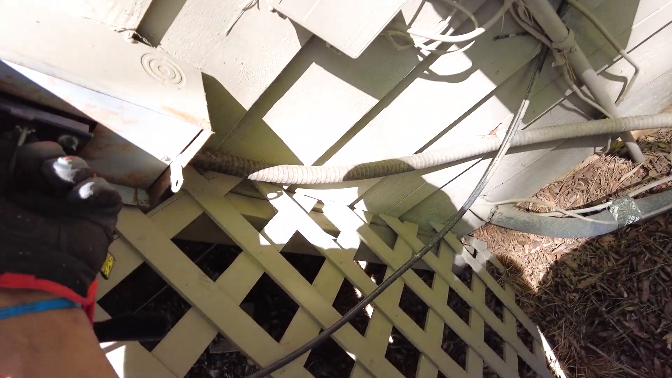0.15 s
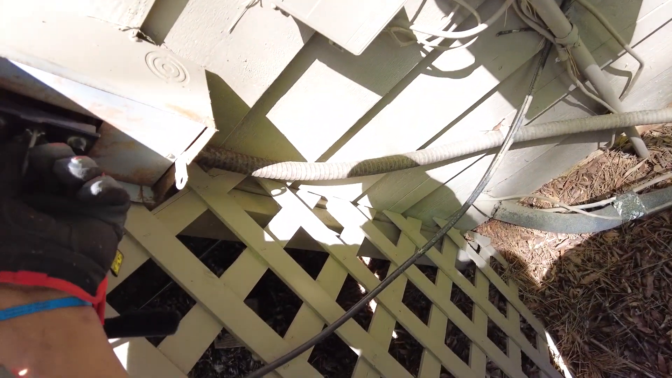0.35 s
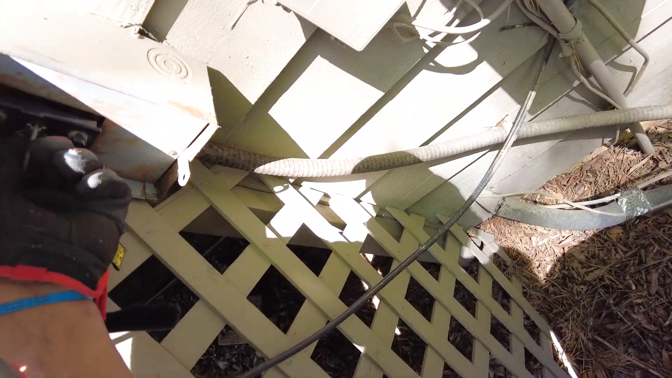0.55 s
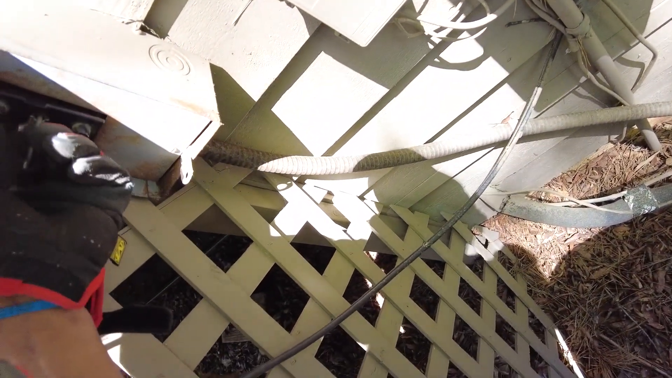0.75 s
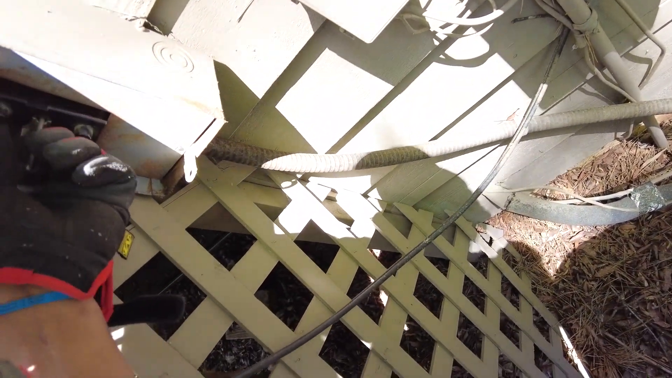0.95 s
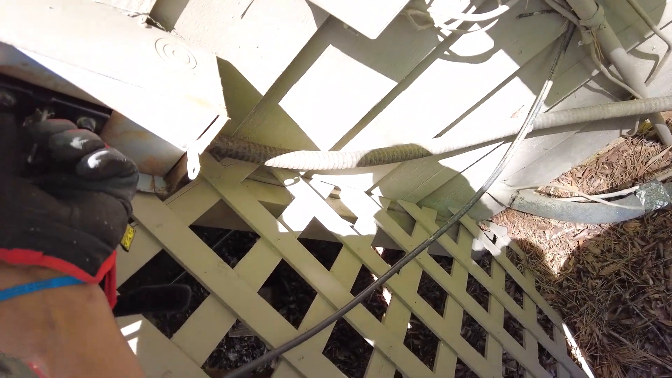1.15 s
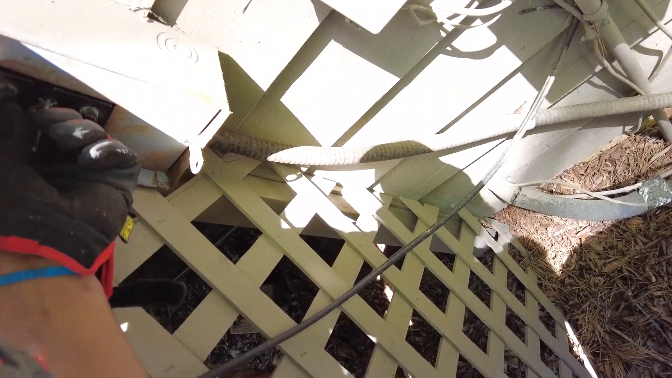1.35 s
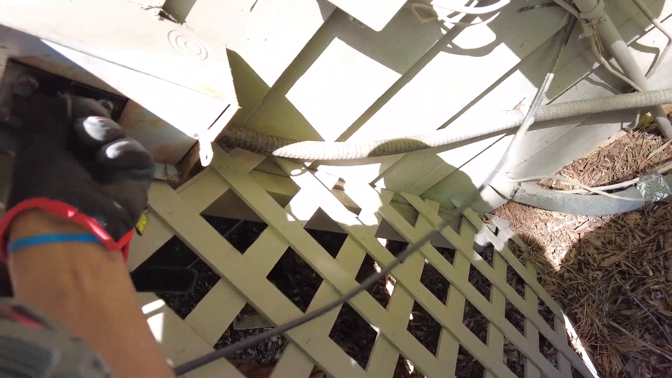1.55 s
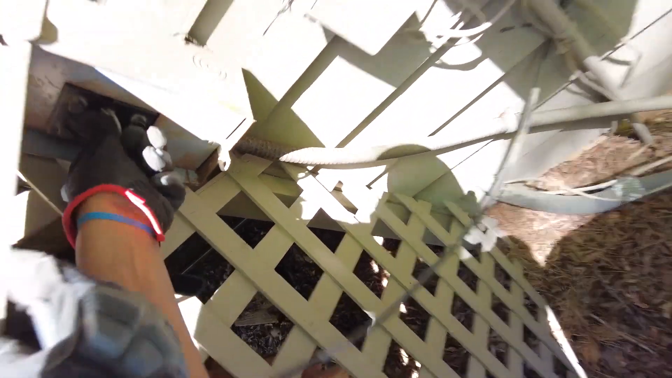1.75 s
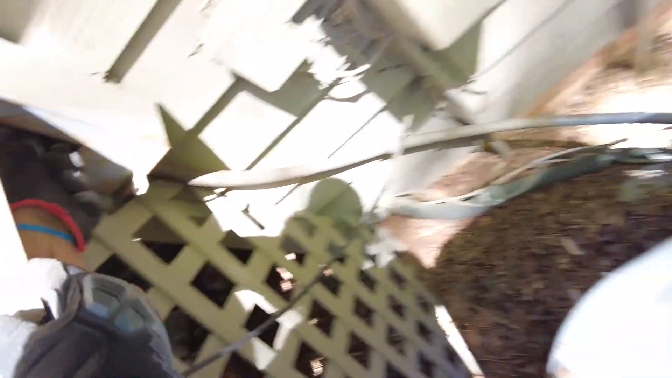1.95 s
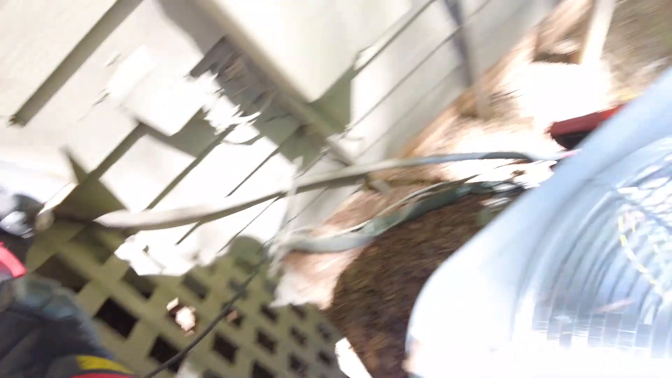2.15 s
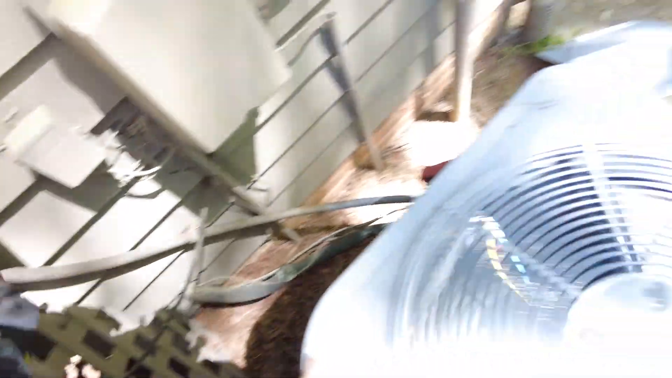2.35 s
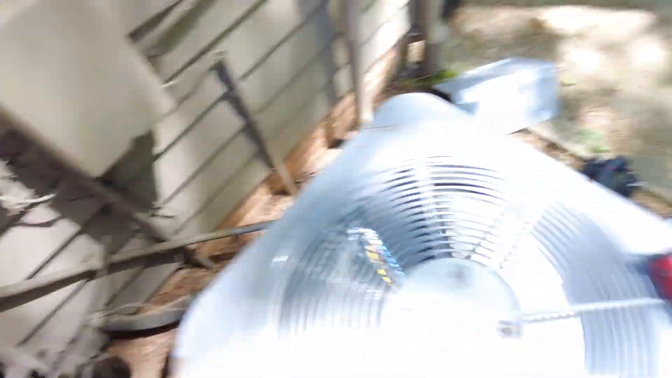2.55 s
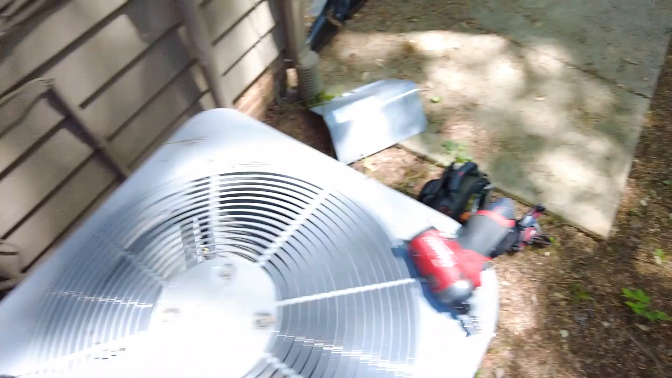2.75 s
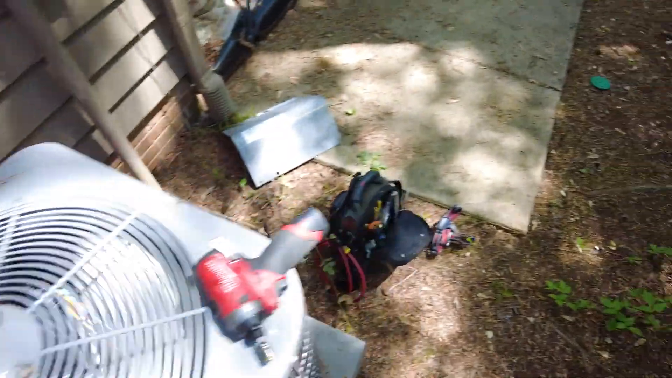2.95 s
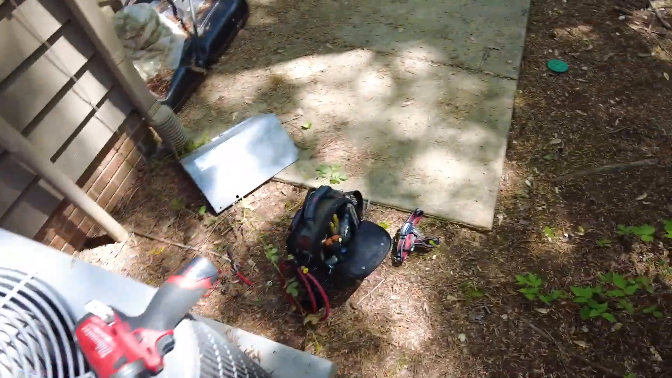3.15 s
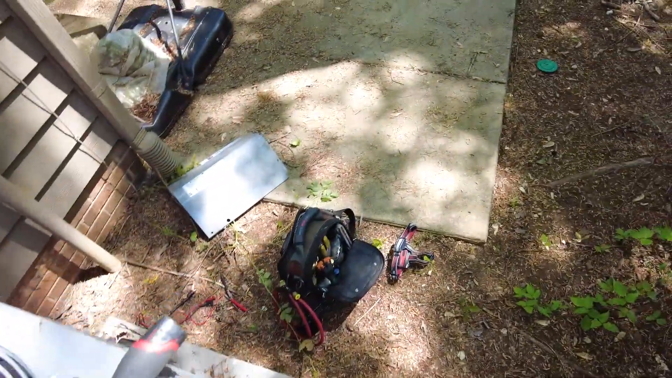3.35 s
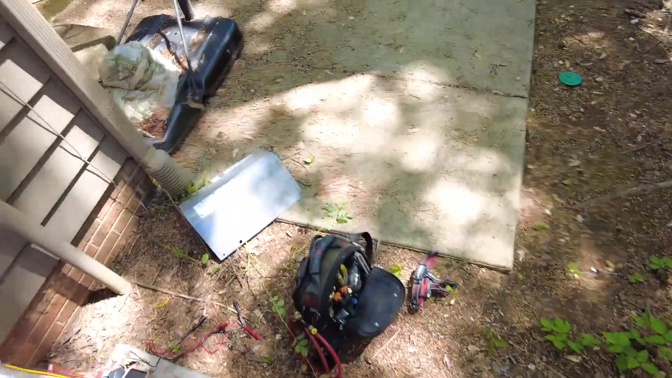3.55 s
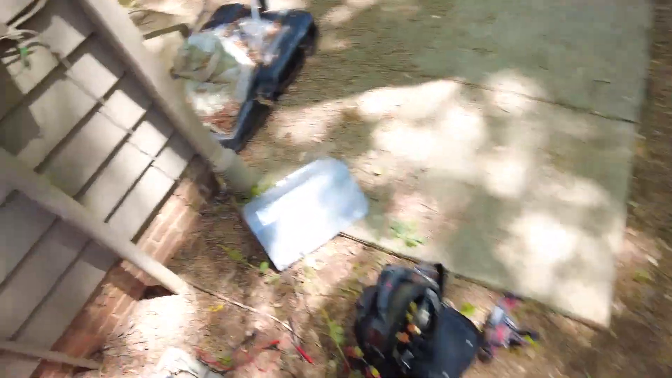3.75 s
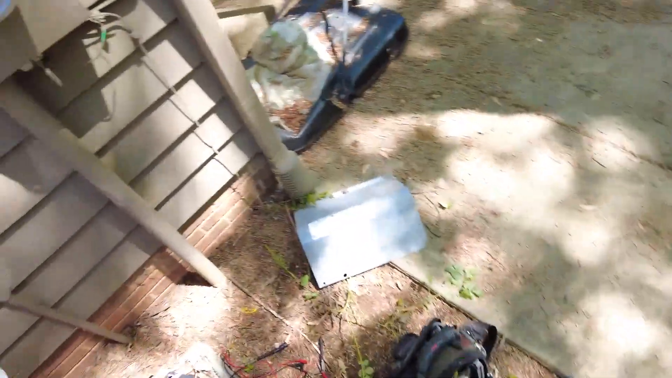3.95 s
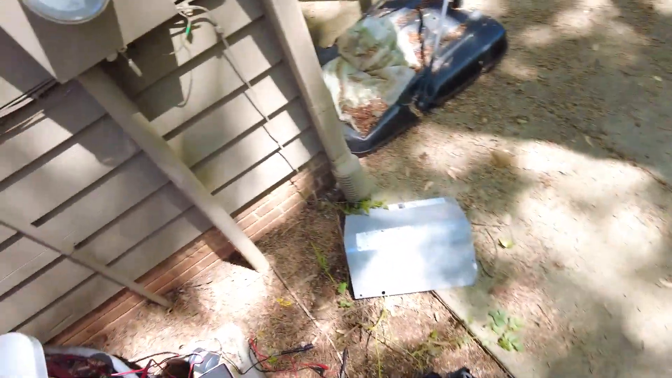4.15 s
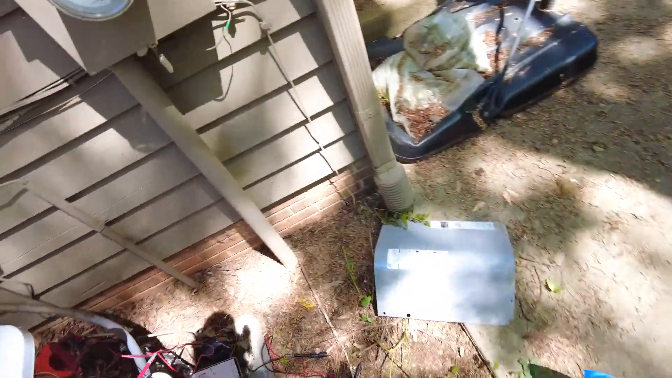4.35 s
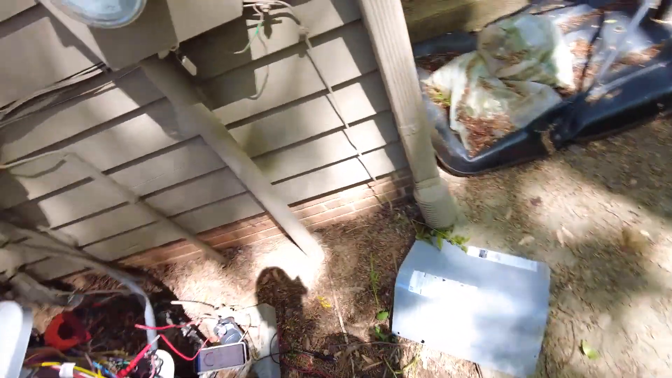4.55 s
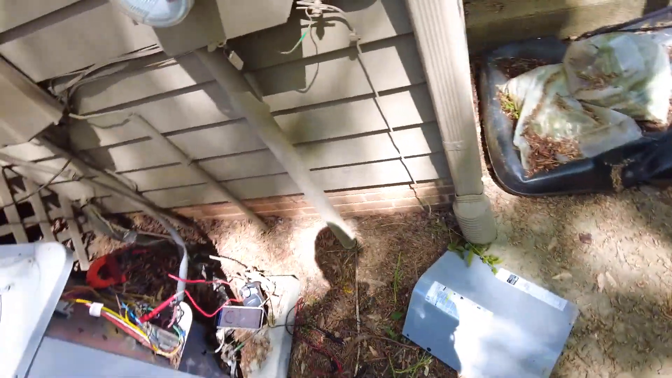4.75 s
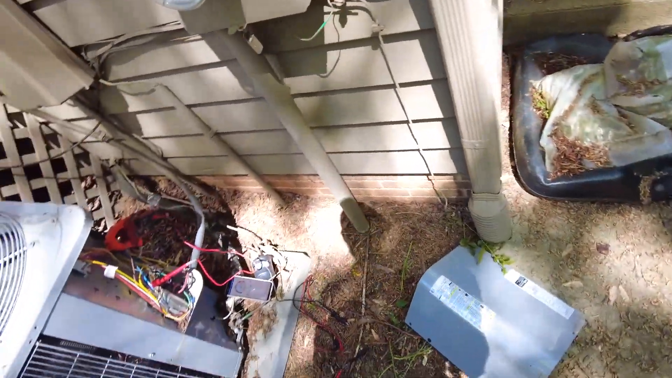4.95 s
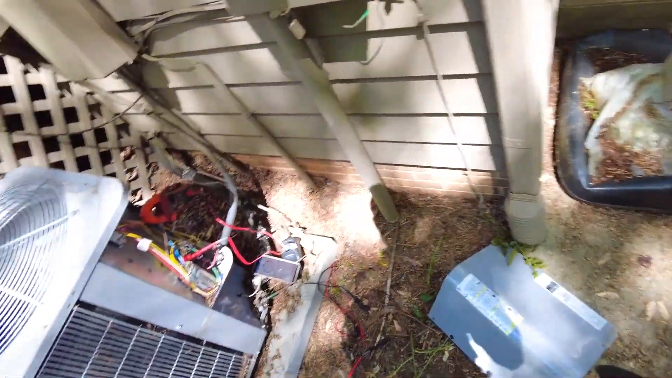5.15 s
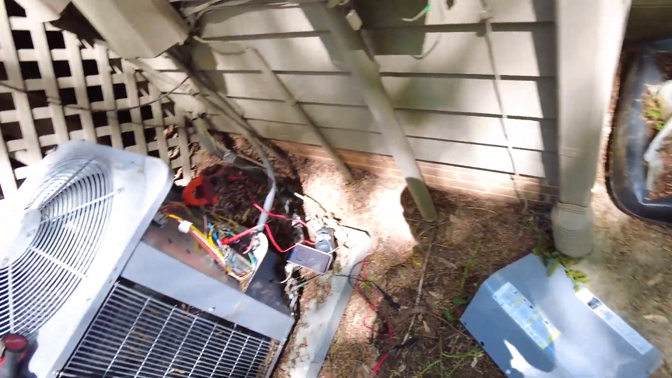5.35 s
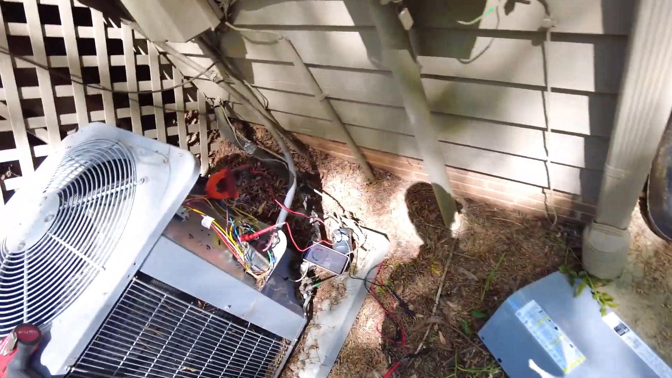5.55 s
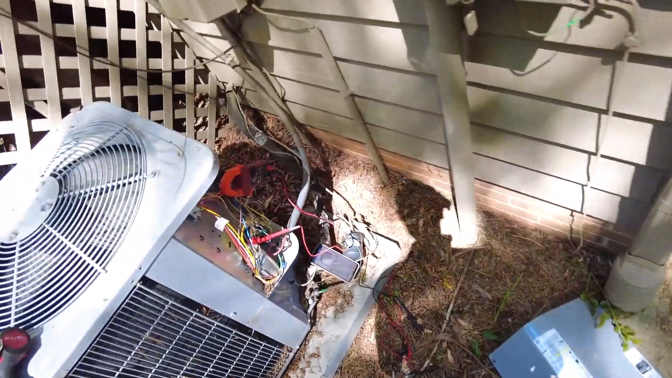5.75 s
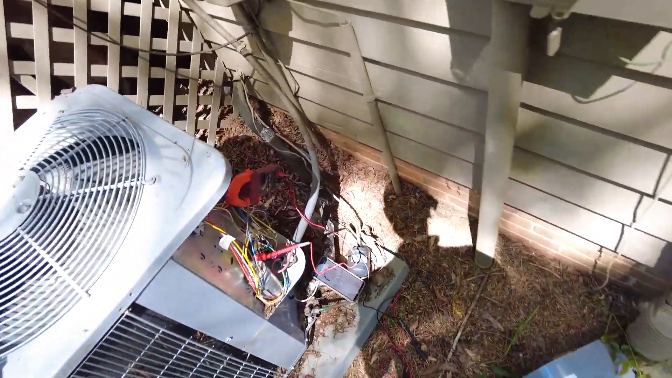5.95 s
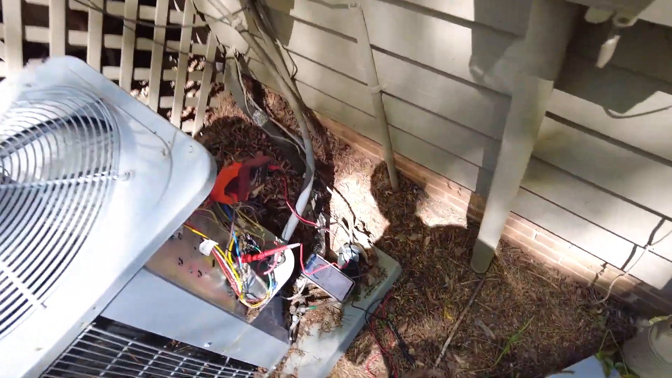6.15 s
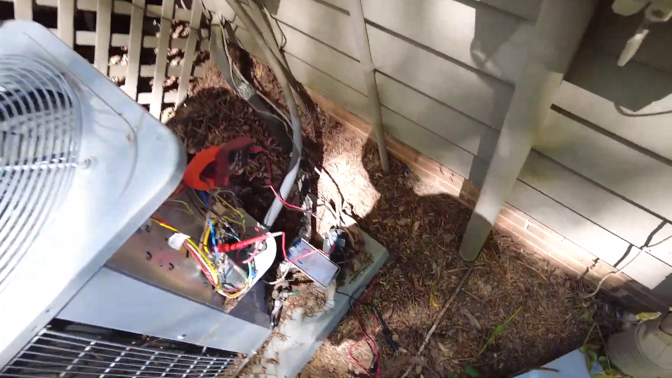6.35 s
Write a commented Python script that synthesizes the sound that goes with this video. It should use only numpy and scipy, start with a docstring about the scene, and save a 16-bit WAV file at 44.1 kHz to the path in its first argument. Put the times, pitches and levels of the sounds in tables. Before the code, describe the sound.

Outdoors by a wall, close to the microphone, a gloved hand knocks and scrapes a plug in a sheet-metal box. A loud clack brings instant electrical hum; the compressor shudders, panels rattle and the fan spins up. The microphone crosses the fan's updraught with heavy wind thumps, then moves round the unit through steady hum, throbbing blades and hissing air, with faint rustles and footsteps.

```python
"""An outdoor air conditioner starts: motor hum at once, then a shuddering compressor and a fan beating against the hum.
Hum, whine and blade tones are sine stacks; rushing air, wind and cloth are coloured noise under gain curves.
Before that a gloved hand works a pull-out plug into the disconnect box: noise cracks with ringing metal modes.
The microphone travels through the fan's updraught and on around the unit, with rustling clothes, mulch and jingles."""
import sys
import numpy as np
from scipy import signal
from scipy.fft import rfft, irfft, next_fast_len
from scipy.io import wavfile
from scipy.ndimage import uniform_filter1d, map_coordinates

SR = 44100
rng = np.random.default_rng(int(sys.argv[2]) if len(sys.argv) > 2 else 0)


def file_out(sig):
    """Save sig as 16-bit WAV at sys.argv[1]."""
    # one column per channel
    cols = np.atleast_2d(sig).T
    # limit, then scale
    lim = np.clip(cols, -1, 1)
    pcm = np.round(lim * 32767).astype(np.int16)
    wavfile.write(sys.argv[1], SR, pcm)


N = 286209

# The plug closes the circuit; the current comes on with this time constant
POWER_ON_S, POWER_RISE_S = 1.41, 0.084
# The microphone passes from the box to the far side of the fan; time constant of the crossfade
CROSSING_S, CROSSING_TIME_CONSTANT_S = 2.68, 0.11
# In every swell table, length is the full width where the bell has fallen to 1/e

# Motor hum: multiple of mains, level at the box/dB, level past the fan/dB, fade from there/(dB/s),
# waver past the fan/dB, extra under the starting load/dB
HUM = [(2, -36.5, -36.5, 2.5, -0.5, 5), (6, -34.5, -45, 0.5, 2, 0), (8, -59.5, -63, -2, 5, -5)]
# Brief dips of the hum: t/s, depth/dB, length/s
HUM_DIPS = [(1.68, 5, 0.075), (2.58, 6, 0.07)]
MAINS_HZ = 60
# The motors draw most current while the compressor takes up its load
LOAD_S, LOAD_LENGTH_S = 1.69, 0.54

# Compressor whine: multiple of shaft speed, level in the first beam/dB, level in the second beam/dB
WHINE = [(17, -12, -19), (18, -0.5, -23), (19, -23, -17), (20, -1.5, -14), (21, -4, -0.5), (22, -7, -8.5),
         (23, -16, -4.5), (24, -7, -18), (28, -13, -12)]
# Beams of the whine that the microphone passes through: t/s, level/dB, length/s
WHINE_BEAMS = [(4.17, -54.5, 1.17), (6.207, -50, 1.33)]
# Low compressor overtones: multiple of shaft speed, level relative to DRONE_DB/dB
DRONE = [(2, 1.5), (3, -6.5), (4, -6), (5, -8.5), (6, -3), (8, -7), (12, -6.5), (14, -10), (16, -12)]
SHAFT_HZ = 59.22
OUTSIDE_BEAM_DB, DRONE_DB = -12.5, -54.5   # the first is relative to each beam
STANDING_DB, STANDING_PER_S = 2.0, 2.0   # spread and pace of the standing-wave swing

# Compressor rocking on its mounts: t/s, level/dB, multiple of mains, f/Hz at t, sag/(Hz/s), rise/(dB/s), fall/(dB/s)
SHUDDERS = [(1.64, -27, 2, 113.4, 147, 168, 115), (1.72, -33, 6, 356, 200, 500, 330)]

# Fan run-up: t/s, blade passes per second/Hz
FAN_SPEED = [(1.4, 0), (2.0, 23.9), (2.5, 35), (2.9, 37.63), (6.5, 37.63)]
# Blade tones: multiple of the blade rate, level past the fan/dB, share of the facing swing
BLADES = [(1, -39, 0.6), (2, -35.5, 1.12), (3, -34.5, 0.6), (5, -63.5, -0.9)]
# Unequal blades buzzing past the grille struts: multiple of the fan's turning rate, level past the fan/dB
BLADE_BUZZ = [(9, -58), (13, -58), (14, -62.5), (15, -61), (18, -65), (21, -64), (22, -68), (30, -61),
              (37, -65.5)]
BLADE_COUNT, BLADES_AT_BOX_DB = 2, -9.5   # the level is relative to past the fan
# How openly the microphone faces the grille: t/s, level/dB
FACING = [(1.45, -1.5), (2.15, -6.5), (2.5, 1.5), (2.85, -8), (3.55, -12), (4.6, -6), (5.1, -6),
          (5.9, -3.5), (6.4, -0.5)]
# Blade rush, cabinet roar, grille hiss: level at full speed/dB, share of the facing swing,
# drop at standstill/dB, fade past the fan/(dB/s)
AIR = [(-49, -0.25, 27, 0.5), (-52.5, -0.38, 13, 1.13), (-46.5, 0.99, 3.5, 0)]
# Colour of the blade rush: f/Hz, density/(dB per Hz)
RUSH = [(130, -4), (200, -6), (270, 3.5), (400, 3.5), (560, 2), (700, -2), (900, -6.5), (1500, -28)]
# Colour of the cabinet roar: f/Hz, density/(dB per Hz)
ROAR = [(500, -6), (700, 9), (900, 5.5), (1150, 8), (1400, 3.5), (1800, -7.5), (2400, -12), (5000, -40)]
# Colour of the grille hiss: f/Hz, density/(dB per Hz)
HISS = [(1000, 4), (1130, 6), (1250, 12), (1320, 9), (1400, 11.5), (1500, 7.5), (1700, 6.5), (2200, 1.5),
        (3100, 1), (3700, -3.5), (4400, -2.5), (5500, -9.5), (7000, -14), (10000, -18.5), (15500, -21.5)]
# Swells of the rush at the start and over the fan rim: t/s, level/dB, length/s
SURGES = [(1.6, -41.5, 0.57), (2.28, -45, 0.37), (2.58, -37.5, 0.24)]
# Colour of those swells: f/Hz, density/(dB per Hz)
SURGE = [(130, -3), (270, -0.5), (450, 1.5), (560, 4.5), (720, -2.5), (870, -8), (1050, -25), (1280, -23),
         (1600, -27), (2500, -15)]

# Cabinet rattle while the compressor takes up its load: t/s, level/dB, length/s
RATTLES = [(1.555, -44.5, 0.046), (1.625, -41.5, 0.077), (1.73, -50, 0.14), (1.9, -40, .1),
           (2.3, -61, 0.26)]
# Loose cabinet panels: f/Hz, level/dB, t60/s
PANELS = [(584, -6, .04), (1070, 0, 0.039), (1280, 0.5, 0.042), (1410, -1, 0.026), (1600, -13, .025),
          (1870, 2, 0.025), (2190, -3, .015), (3030, -4.5, 0.0088)]
RATTLE_PER_S = 200   # average ticks

# Plug, box and lid knocks: t/s, level/dB, hardness as tilt/(dB/octave), t60/s, main ring f/Hz, main ring over level/dB
KNOCKS = [(.135, -46, -3, 0.077, 1740, 4), (.150, -47.5, -3, 0.072, 2890, 2),
          (.264, -54, -3, 0.043, 3740, 6), (.368, -40, -1, 0.084, 2470, 1.5),
          (.383, -48.5, -2.5, 0.23, 1102, 7.5), (.417, -41, -3.5, 0.08, 475, 10),
          (.431, -45.5, -2.5, 0.098, 1797, -2), (.552, -48.5, -3, 0.11, 456, 7.5),
          (.630, -41.5, -4, 0.086, 1750, 5), (.808, -46, -5, 0.085, 501, 4.5),
          (.908, -46.5, -3, 0.076, 1780, 9), (.926, -40, -2.5, 0.077, 2750, 6),
          (.933, -37.5, 3, 0.032, 5570, 9.5), (1.147, -46, 4.5, 0.064, 1463, 13.5),
          (1.149, -53, 4, 0.022, 6000, 27.5), (1.343, -49, -3.5, 0.97, 507, -14),
          (1.383, -22.5, 3, 0.046, 1095, -1), (1.391, -33, 0, 0.045, 514, 0),
          (1.400, -23.5, -0.5, 0.05, 794, 4.5), (1.409, -25.5, 1, .03, 546, 5),
          (1.416, -32, -1, 0.068, 1070, 2), (1.477, -47, -0.5, 0.12, 1250, 7),
          (1.538, -45.5, -0.5, 0.12, 230, 13), (1.821, -43.5, -3.5, 0.057, 1460, 14),
          (1.877, -32.5, -2.5, 0.04, 1464, 11.5), (1.885, -45, 0, .025, 4950, 12),
          (1.893, -36, 2, 0.023, 5450, 9), (1.902, -38, 1, 0.022, 6050, 9),
          (1.911, -38, -0.5, 0.027, 4450, 8), (1.927, -36, -4, 0.044, 4340, 9),
          (1.949, -38, -1, 0.049, 550, 12), (1.996, -43.5, -8.5, 0.074, 572, 5),
          (2.505, -46.5, 1.5, 0.39, 3240, -5), (2.662, -39.5, 3.5, 0.06, 2100, 3.5)]
# Modes of the sheet-metal box: f/Hz, level/dB, t60/s
BOX = [(237.6, 0.5, 0.16), (462, 3, 0.12), (559, 4.5, 0.093), (802, -2.5, 0.13), (1082, -4, 0.12),
       (1270, -8, 0.14), (1505, 0.5, 0.17), (1808, 2.5, 0.086), (2670, -6, 0.061), (2850, -6.5, 0.099),
       (3150, -12, 0.082), (3370, -22.5, 0.47), (4580, -27, 0.28), (4320, 8.5, 0.028), (4700, 5.5, 0.03),
       (5950, 9, 0.03), (7770, -1, 0.04), (11800, -5, 0.03)]
# Crack of a contact: f/Hz, density/(dB per Hz)
CRACK = [(110, 3), (230, 6.5), (520, 9), (850, -9), (1150, 5.5), (1750, 4), (2100, -1), (3500, -1),
         (6100, -2.5), (7000, -4.5), (10000, -6), (15000, -8)]
# Colour of a contact of middling hardness: f/Hz, level/dB
CONTACT = [(450, 0.5), (1400, -0.5), (3500, -1), (7000, -14), (10000, -15.5)]
PIVOT_HZ = 1400   # hardness tilts the colour about this pitch
# Thumps of the glove heel on the panel: t/s, level/dB, panel f/Hz, t60/s
THUMPS = [(0.4157, -21, 268, 0.074), (.550, -21, 260, 0.025), (.926, -23.5, 485, 0.075)]
THUMP_RISE_S = 0.0034
# Plug and glove sliding on metal, later boots scuffing the ground: t/s, level/dB, length/s
SLIDES = [(.46, -52, 0.092), (.62, -51.5, 0.24), (.92, -43, 0.058), (.97, -47.5, 0.083), (1.11, -50, 0.076),
          (1.23, -51, .03), (1.64, -40.5, 0.14), (1.77, -52, 0.12), (1.905, -34, 0.078), (1.988, -34, 0.03),
          (4.07, -53, 0.13), (4.6, -46.5, 0.17), (6.3, -47, 0.29)]
# Colour of the sliding: f/Hz, density/(dB per Hz)
SCRAPE = [(200, -5), (330, 10.5), (500, 12), (700, 3.5), (950, -9), (1400, 3.5), (2100, -17.5), (3300, -15),
          (5000, -16), (7000, -31), (12000, -35)]
# Squeaks where plug and glove drag: t/s, level/dB, length/s, f/Hz, glide/(octaves/s)
SQUEAKS = [(0.681, -54, .07, 900, -4.5), (0.914, -40, .025, 542, 1.5), (0.921, -40, .022, 720, 1),
           (1.567, -37.5, 0.025, 1413, 9.5), (1.825, -46, .018, 1422, -7.5),
           (1.888, -31.5, .03, 1424, -2.5)]

# Gusts on the microphone: t/s, level/dB, length/s
GUSTS = [(1.43, -37.5, 0.13), (1.58, -43, 0.23), (2.0, -37.5, 0.29), (2.42, -41, 0.22), (2.6, -21, 0.093),
         (2.68, -23, 0.042), (2.77, -13, 0.1), (2.87, -10.5, 0.15), (3.04, -19.5, 0.14), (3.28, -36, 0.33)]
# Colour of gusts and draught: f/Hz, density/(dB per Hz)
WIND = [(11, -8.5), (25, 6), (44, 7), (65, -8), (95, -2.5), (160, -18.5), (230, -18.5), (450, -29),
        (750, -53), (1500, -69), (4000, -94)]
DRAUGHT_DB, DRAUGHT_FOLLOWS = -33.5, 2.4   # steady draught past the fan; share of the facing swing
# Single eddies that hit the microphone and die away: t/s, level/dB, t60/s
EDDIES = [(2.573, -21, 0.086), (2.667, -12.5, 0.22), (2.711, -9.5, 0.15), (2.783, -13.5, 0.21),
          (2.803, -13, 0.26), (2.841, -11, 0.18), (2.885, -18.5, 0.31), (2.937, -14.5, 0.23),
          (2.972, -22, 0.087), (3.005, -17.5, 0.11), (3.036, -18.5, 0.086)]
# Colour of the eddies: f/Hz, density/(dB per Hz)
BUFFET = [(30, 3.5), (100, 5.5), (170, 1), (240, -5.5), (330, -9), (450, -16.5), (700, -24), (1000, -46),
          (2000, -54)]
EDDY_RISE_S = 0.00254
FRONT_HALF_WIDTH_S, FRONT_DB = 0.0011, -1   # pressure front of an eddy; its height over the eddy's level
# Fastest air tearing at the microphone ports: t/s, level/dB, length/s
TEARS = [(2.62, -34, 0.046), (2.68, -44, 0.036), (2.845, -27, 0.049), (2.925, -35, 0.065)]
# Colour of the tearing: f/Hz, density/(dB per Hz)
TEARING = [(300, 0), (500, 4), (700, -9), (900, -12), (1400, -19), (2500, -34)]

# Twigs and grit under the boots: t/s, level/dB, hardness as tilt/(dB/octave), t60/s, main ring f/Hz, ring over level/dB
TWIGS = [(3.192, -55, -6, 0.11, 1270, 10), (3.230, -50.5, 1, 0.035, 1910, -2),
         (3.994, -46.5, 2.5, 0.03, 2110, 4.5)]
# Strokes of sleeve, glove and boots in the mulch: t/s, level/dB, length/s
RUSTLES = [(.445, -67, 0.1), (1.68, -49, 0.13), (1.915, -48.5, 0.06), (2.04, -52, 0.46),
           (2.28, -41.5, 0.031), (2.42, -46.5, 0.077), (2.525, -50.5, 0.045), (2.85, -52.5, 0.56),
           (3.2, -56, 0.24), (4.6, -57, 0.13), (5.23, -55.5, 0.11), (5.82, -55, .16), (6.32, -48, 0.092)]
# Colour of the rustling: f/Hz, density/(dB per Hz)
CLOTH = [(1500, 16.5), (2500, -11), (3100, -17), (3900, -5), (4400, 4), (5200, -1), (6100, 0), (6900, -7),
         (7700, -1.5), (8500, -6), (9400, -4.5), (10200, -6.5), (12000, -6), (15500, -6.5)]
STIRRING_FROM_S, STIRRING_DB = 1.5, -63   # the hand lets go and the clothes keep stirring
# Thin jingles of small metal things with the steps: t/s, level/dB, length/s
JINGLES = [(4.695, -55, 0.031), (4.765, -61, 0.11), (5.23, -63, .08)]
# Modes of those small things: f/Hz, level/dB, t60/s
TRINKETS = [(10800, -5, 0.0095), (13500, -6, .005), (14700, -2, .003), (15600, 0, .007)]
JINGLE_PER_S = 300   # average ticks

# Colour of the quiet yard: f/Hz, density/(dB per Hz)
YARD = [(12, -31), (20, -27), (43, 7), (76, 5.5), (180, -8), (249, -11), (310, -23.5), (525, -18.5),
        (620, -22.5), (966, -26.5), (1050, -28), (1460, -22.5), (2100, -34), (2850, -35.5), (10800, -56.5),
        (15000, -58)]
YARD_DB = -45.5

# Stereo spread at arm's length: f/Hz, side minus middle level/dB
NEAR = [(85, -13), (170, -11), (320, -8), (550, 3.5), (880, 4), (1080, 10.5), (1400, -16), (2200, -4.5),
        (4000, -5.5), (7500, -1), (12500, 1)]
# Stereo spread farther off: f/Hz, side minus middle level/dB
FAR = [(35, -26), (85, -22.5), (170, -15), (320, -10.5), (550, -4), (880, 6), (1400, -10), (2200, -8),
       (4000, -2.5), (7500, -0.5), (12500, -1.5)]
# The image closes to mono at MONO_S over NARROW_S, then opens at a rate that would take REOPEN_S to full width
MONO_S, NARROW_S, REOPEN_S = 3.513, 0.65, 3.97
CUTOFF_HZ = 15900


def motor_hum():
    """The pull on the windings peaks twice per mains cycle, with a strong third overtone; loudest by the box."""
    t, past, out = np.arange(N) / SR, past_fan(), 0
    load = swells([(LOAD_S, 0, LOAD_LENGTH_S)])
    dip_db = sum(depth_db * swells([(s, 0, length)]) for s, depth_db, length in HUM_DIPS)
    for k, box_db, far_db, fade_db_per_s, waver_db, load_db in HUM:
        here_db = box_db + load * load_db - dip_db
        walk_db = past * (far_db - box_db - fade_db_per_s * (t - CROSSING_S))
        db = here_db + walk_db + waver_db * past * drift(7)
        out = out + from_db(db) * tone(round(k) * MAINS_HZ * t, k * MAINS_HZ)
    return powered() * out


def compressor(run_up_s=.1):
    """The shaft runs up to just under mains speed; its shell beams a different overtone mix to each side."""
    speed = 1 - np.exp(-np.maximum(np.arange(N) / SR - POWER_ON_S, 0) / run_up_s)
    turns = np.cumsum(SHAFT_HZ * speed * (1 + .0005 * drift(8))) / SR
    first, second = [np.hypot(from_db(db + OUTSIDE_BEAM_DB), swells([(s, db, length)]))
                     for s, db, length in WHINE_BEAMS]
    gains = [(k, from_db(DRONE_DB + db) * standing()) for k, db in DRONE]
    for k, first_db, second_db in WHINE:
        gains.append((k, np.hypot(first * from_db(first_db), second * from_db(second_db))))
    overtones = sum(gain * tone(round(k) * turns + rng.random(), k * SHAFT_HZ) for k, gain in gains)
    return speed ** 2 * overtones


def shudder():
    """Each starting jolt peaks in step with a tone of the hum, sagging in pitch as it swells and dies."""
    out = 0
    for s, peak_db, k, hz, sag_hz_per_s, rise_db_per_s, fall_db_per_s in SHUDDERS:
        t = np.arange(N) / SR - s
        turns = round(k) * MAINS_HZ * s + hz * t - .5 * sag_hz_per_s * t ** 2
        db = peak_db + np.minimum(rise_db_per_s * t, -fall_db_per_s * t)
        out = out + from_db(db) * tone(turns, hz)
    return powered() * out


def fan(chop=0.065):
    """Blade tones and buzz; air rushes, roars in the cabinet and hisses through the grille, pulsed by the blades."""
    (rate,), (facing_db,), full_rate = in_time(FAN_SPEED), in_time(FACING), FAN_SPEED[-1][1]
    turns, speed = np.cumsum(rate) / SR, rate / full_rate
    blades = 0
    for k, db, follows in BLADES:
        gain = from_db(db + follows * facing_db + .5 * drift(15))
        blades = blades + gain * tone(round(k) * turns, k * full_rate)
    for k, db in BLADE_BUZZ:
        buzz = tone(round(k) * turns / BLADE_COUNT + rng.random(), k * full_rate / BLADE_COUNT)
        blades = blades + from_db(db) * standing() * buzz
    blades = blades * speed ** 2 * from_db(BLADES_AT_BOX_DB * (1 - past_fan()))
    walked_s = np.maximum(np.arange(N) / SR - CROSSING_S, 0)
    rush, roar, hiss = [
        from_db(db + follows * facing_db - slow_db * (1 - speed) - fade_db_per_s * walked_s + .5 * drift(30))
        for db, follows, slow_db, fade_db_per_s in AIR]
    air = rush * noise(RUSH) + swells(SURGES) * noise(SURGE)
    air = air + past_fan() * roar * noise(ROAR) + hiss * noise(HISS)
    pulses = 1 + chop * np.sin(2 * np.pi * turns)
    return blades + powered() * air * from_db([[.7], [-.7]]) * pulses   # air leans slightly left


def clatter(bursts, per_s, modes, uneven_db):
    """Loose parts tick unevenly in bursts; each tick rings every mode with a strength of its own."""
    at = np.cumsum(rng.uniform(.2, 1.8, 4096)) / per_s
    at = (at[at < N / SR] * SR).astype(int)
    sizes, out = from_db(uneven_db * np.clip(rng.standard_normal(4096), -2, 2)), 0
    for hz, db, t60 in modes:
        clicks = np.zeros((2, N))
        clicks[:, at] = (sizes * rng.standard_normal((2, 4096)))[:, :len(at)]
        r, w = dying(1 / SR, t60), 2 * np.pi * hz / SR
        # two-pole resonator
        rung = signal.lfilter([0, np.sin(w)], [1, -2 * r * np.cos(w), r * r], clicks + 1e-18)
        out = out + rung * from_db([[db], [db + at_hz(NEAR, hz)]])
    mid, side = out / np.std(out[0])
    return swells(bursts) * np.array([mid + side, mid - side])


def contacts(rows, modes, crack_db, ring_db, tail_db, tail_t60, rise_s):
    """Each contact cracks and rings the struck thing and a main tone; a dull tail lingers between wall and unit."""
    out, t = np.zeros((2, N + SR)), np.arange(SR // 3) / SR
    grid = np.geomspace(100, 16000, 60)
    dull = signal.butter(1, 3500, fs=SR, output="sos")
    for s, level_db, tilt, t60, main_hz, main_db in rows:
        colour = [(hz, level_db + db + tilt * np.log2(hz / PIVOT_HZ)) for hz, db in CONTACT]
        density_db = at_hz(CRACK, grid) + at_hz(colour, grid)
        strength = np.sqrt(np.sum(from_db(density_db) ** 2 * np.gradient(grid)) / CONTACT[0][0])
        burst = strength * noise(np.transpose([grid, density_db]), NEAR, size=len(t))
        crack = burst * from_db(crack_db) * dying(t, t60)
        tail = signal.sosfilt(dull, burst) * from_db(tail_db) * dying(t, tail_t60)
        hit = crack + tail
        # every blow excites the modes a little differently
        struck = [(hz, ring_db + db + 2.5 * rng.normal(), ring_t60) for hz, db, ring_t60 in modes]
        for hz, db, ring_t60 in struck + [(main_hz, main_db, t60)]:
            ring = tone(hz * t + rng.random(), hz, NEAR)
            hit += from_db(db + at_hz(colour, hz)) * dying(t, ring_t60) * ring
        start = round(s * SR)
        out[:, start:start + len(t)] += hit * (1 - np.exp(-t / rise_s))
    return out[:, :N]


def thumps():
    """A soft, heavy push bends the panel, which swings a few times against the glove."""
    out = 0
    for s, db, hz, t60 in THUMPS:
        age = np.clip(np.arange(N) / SR - s, 0, 1)
        push = 1 - np.exp(-(age / THUMP_RISE_S) ** 2)
        out = out + from_db(db) * push * dying(age, t60) * tone(hz * age, hz, NEAR)
    return out


def sliding(grain_db=2.5):
    """Surfaces stick and slip, which roughens a scraping noise."""
    return swells(SLIDES) * noise(SCRAPE, NEAR) * rms_one(from_db(grain_db * drift(140)))


def squeaks(jitter=0.0667, rough_db=4.0):
    """Short, rough gliding tones of fast stick and slip."""
    t, out = np.arange(N) / SR, 0
    unsteady, grain = 1 + jitter * drift(500), from_db(rough_db * drift(250))
    for s, db, length, hz, glide in SQUEAKS:
        pitch = hz * 2 ** (glide * np.clip(t - s, -length, length)) * unsteady
        out = out + swells([(s, db, length)]) * tone(np.cumsum(pitch) / SR, hz, NEAR)
    return out * grain


def updraught():
    """Air rumbles on the microphone; above the fan, steep-fronted eddies hit it and fast air tears at the ports."""
    t, hits, fronts = np.arange(N) / SR, 0, 0
    for s, db, t60 in EDDIES:
        age = np.clip(t - s, 0, 1)
        hits = np.hypot(hits, from_db(db) * (1 - np.exp(-age / EDDY_RISE_S)) * dying(age, t60))
        front = swells([(s + 2 * EDDY_RISE_S, db + FRONT_DB, 2 * FRONT_HALF_WIDTH_S)])
        fronts = fronts + rng.choice([-1, 1]) * front   # push or pull at random
    draught = past_fan() * from_db(DRAUGHT_DB + DRAUGHT_FOLLOWS * in_time(FACING)[0] + 2 * drift(15))
    rumble = np.hypot(swells(GUSTS), draught) * evened(noise(WIND), window_s=0.055)
    buffeting = hits * evened(noise(BUFFET), window_s=0.0234)
    tearing = swells(TEARS) * from_db(2 * drift(70)) * noise(TEARING)
    return rumble + fronts + buffeting + tearing


def rustle():
    """Sleeve, glove and mulch rub in small clumped grains; the clothes stir on once the hand lets go."""
    stirring = (np.arange(N) / SR > STIRRING_FROM_S) * from_db(STIRRING_DB)
    grains = rms_one(from_db(2.2 * drift(400) + 1.2 * drift(30)))
    return np.hypot(stirring, swells(RUSTLES)) * noise(CLOTH) * grains


def quiet_yard():
    """A steady bed of coloured noise, mostly low."""
    return from_db(YARD_DB) * noise(YARD)


def powered():
    """Rises from 0 towards 1 when the current comes on."""
    return 1 - np.exp(-np.maximum(np.arange(N) / SR - POWER_ON_S, 0) / POWER_RISE_S)


def past_fan():
    """0 at the box, 1 on the far side of the fan."""
    return .5 + .5 * np.tanh((np.arange(N) / SR - CROSSING_S) / CROSSING_TIME_CONSTANT_S)


def standing():
    """Gain of one tone as the microphone moves through the standing waves between wall and unit."""
    return from_db(STANDING_DB * drift(STANDING_PER_S))


def swells(rows):
    """Gain of bell-shaped swells, each with its moment, level and length."""
    t = np.arange(N) / SR
    return sum(from_db(db) * np.exp(-np.minimum((2 * (t - s) / length) ** 2, 50)) for s, db, length in rows)


def dying(t, t60):
    """A fall of 60 dB in t60 seconds."""
    return np.exp(-np.log(1000) * t / t60)


def tone(turns, hz, spread=FAR):
    """A stereo sine whose middle has rms 1; it reaches the two sides out of step."""
    angle = (2 * np.pi * (turns % 1)).astype(np.float32)
    side = from_db(at_hz(spread, hz)) * np.cos(angle)
    return np.sqrt(2) * (np.sin(angle) + side * np.array([[1], [-1]]))


def noise(spectrum, spread=FAR, size=N):
    """Coloured stereo noise whose middle has rms 1; the side's share follows the spread curve."""
    padded = next_fast_len(size)
    hz = np.fft.rfftfreq(padded, 1 / SR)
    # steep roll-off beyond both ends of the colour curve
    skirts = (1 + (spectrum[0][0] / (hz + 1)) ** 8) * (1 + (hz / spectrum[-1][0]) ** 8)
    colour = from_db(at_hz(spectrum, hz)) / np.sqrt(skirts)
    mid, side = rfft(rng.standard_normal((2, padded))) * colour
    mid, side = irfft([mid, side * from_db(at_hz(spread, hz))], padded)[:, :size]
    return np.array([mid + side, mid - side]) / np.std(mid)


def evened(x, window_s):
    """Hold a noise at a steady level, so that its envelope alone shapes it."""
    power = uniform_filter1d(x.mean(axis=0) ** 2, max(int(window_s * SR), 1))
    return x / np.sqrt(power + 1e-6)


def drift(rate):
    """Smooth random wander with rms 1, through rate random points per second."""
    steps = np.arange(N) / SR * rate
    return rms_one(map_coordinates(rng.standard_normal(4096), [steps], order=2, mode="wrap"))


def in_time(rows):
    """Each column of a curve at every sample."""
    s, *columns = np.transpose(rows)
    return [np.interp(np.arange(N) / SR, s, c) for c in columns]


def at_hz(points, hz):
    """Read a spectrum on a log-frequency axis."""
    f, value = np.transpose(points)
    return np.interp(np.log(np.maximum(hz, 1)), np.log(f), value)


def rms_one(x):
    """Scale to unit rms."""
    return x / np.sqrt(np.mean(x ** 2) + 1e-20)


def from_db(db):
    """Decibels to gain."""
    return 10 ** (np.asarray(db) / 20)


def scene():
    """The machine, the plug and the person moving around them, over a quiet yard."""
    rattle = clatter(RATTLES, RATTLE_PER_S, PANELS, uneven_db=3.5)
    machine = motor_hum() + compressor() + shudder() + fan() + rattle
    plug = contacts(KNOCKS, BOX, crack_db=-5.5, ring_db=-10.0, tail_db=-40.5, tail_t60=0.96, rise_s=0.0016)
    twigs = contacts(TWIGS, [], crack_db=-6.0, ring_db=-6.0, tail_db=-17.0, tail_t60=0.25, rise_s=0.00029)
    handling = plug + thumps() + sliding() + squeaks() + twigs
    handling = handling * from_db([[.6], [-.6]])   # leans slightly left
    jingle = clatter(JINGLES, JINGLE_PER_S, TRINKETS, uneven_db=7.0)
    return machine + handling + updraught() + rustle() + jingle + quiet_yard()


def record(dry):
    """The stereo image closes and reopens at steady rates, peaks are rounded, the top is cut."""
    mid, t = dry.mean(axis=0), np.arange(N) / SR - MONO_S
    width = np.minimum(np.maximum(-t / NARROW_S, t / REOPEN_S), 1)
    image = mid + (dry - mid) * width
    top = signal.ellip(10, .1, 80, CUTOFF_HZ, fs=SR, output="sos")
    return signal.sosfilt(top, np.tanh(image))


dry = scene()
out = record(dry)
file_out(out)
```